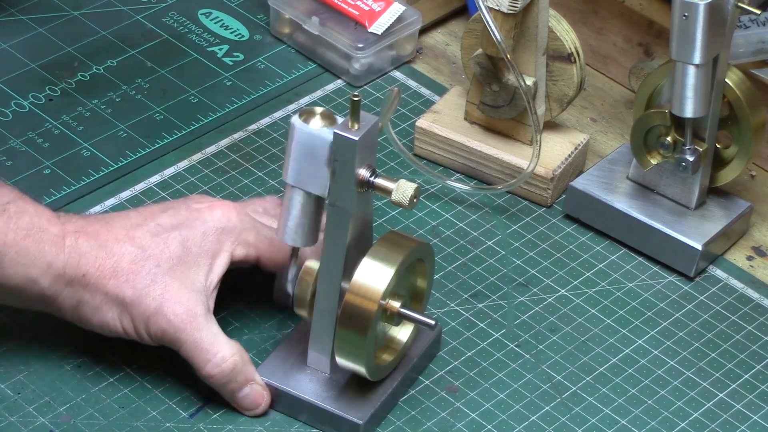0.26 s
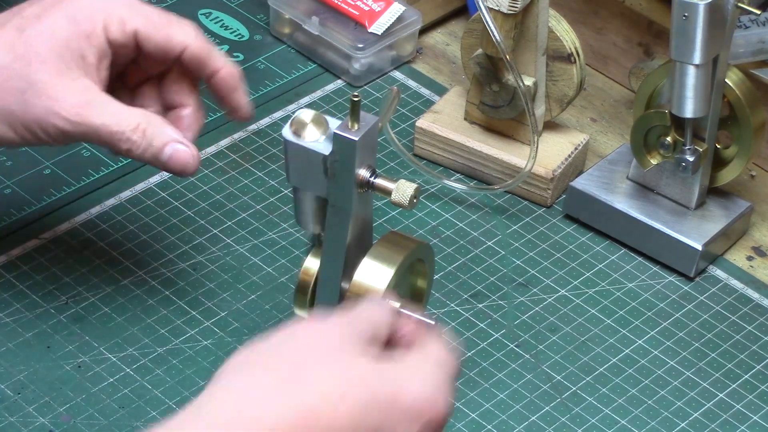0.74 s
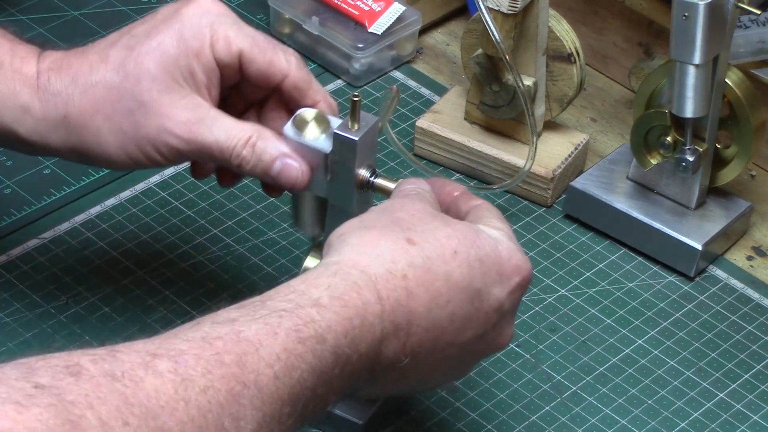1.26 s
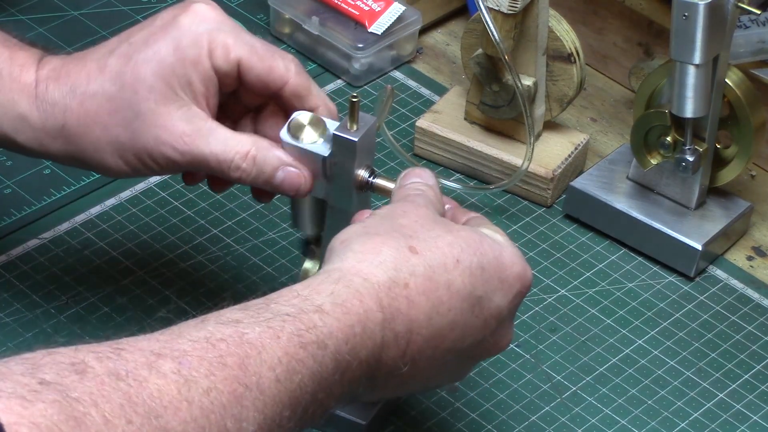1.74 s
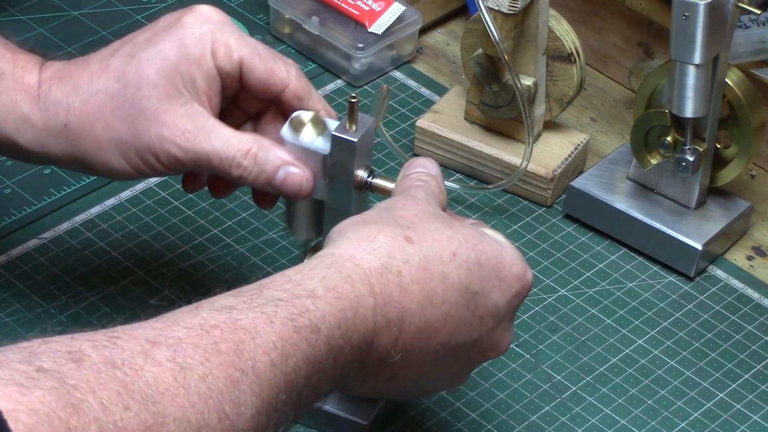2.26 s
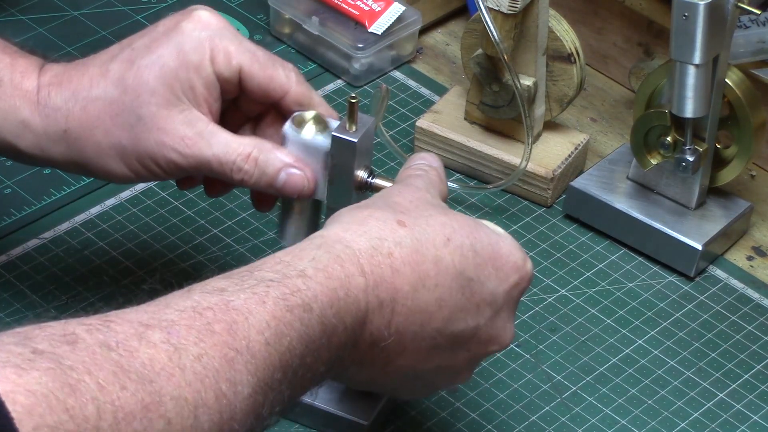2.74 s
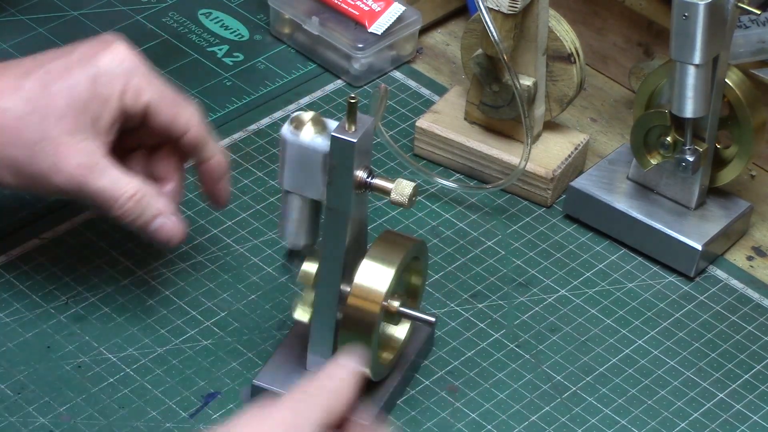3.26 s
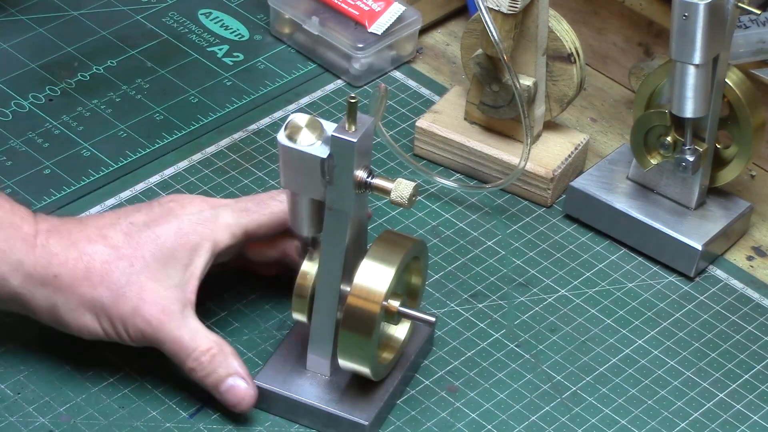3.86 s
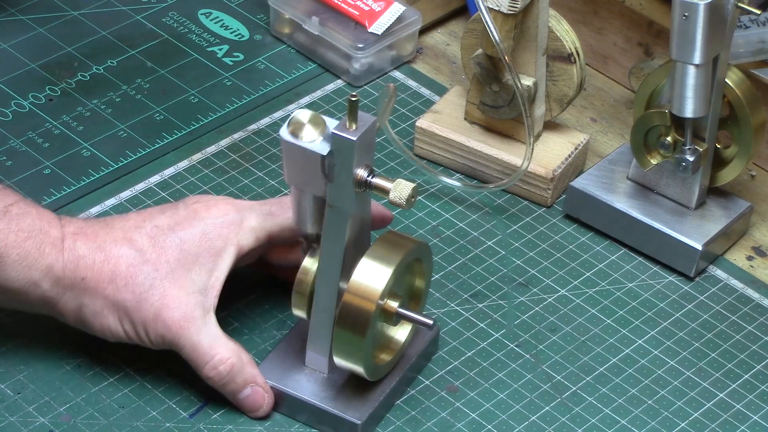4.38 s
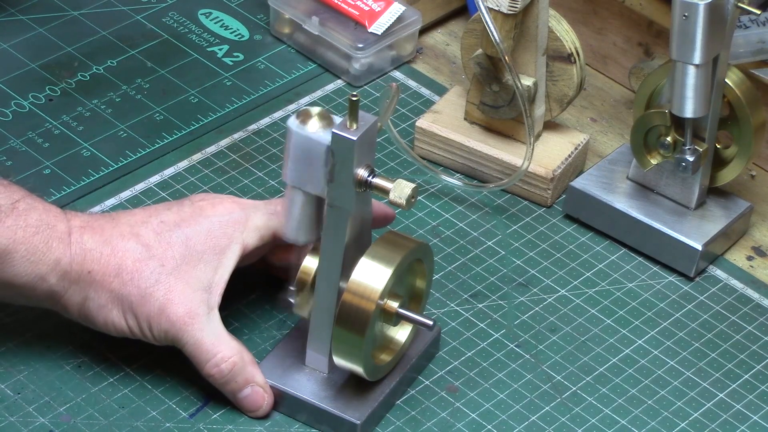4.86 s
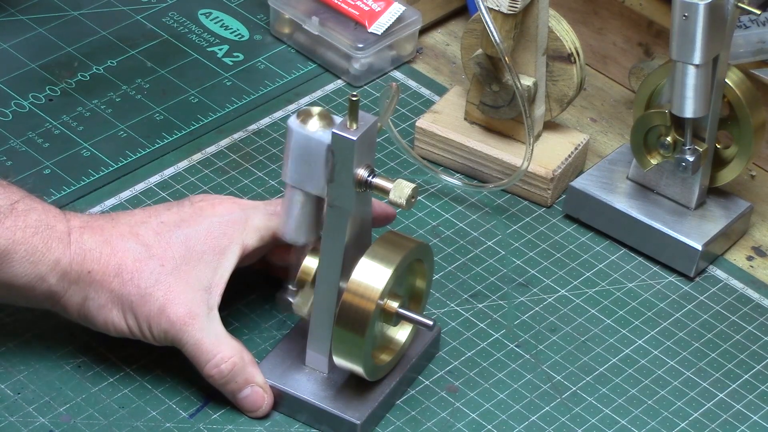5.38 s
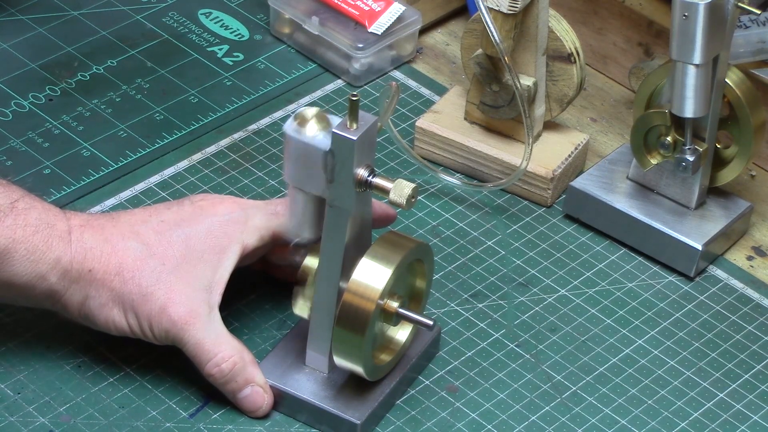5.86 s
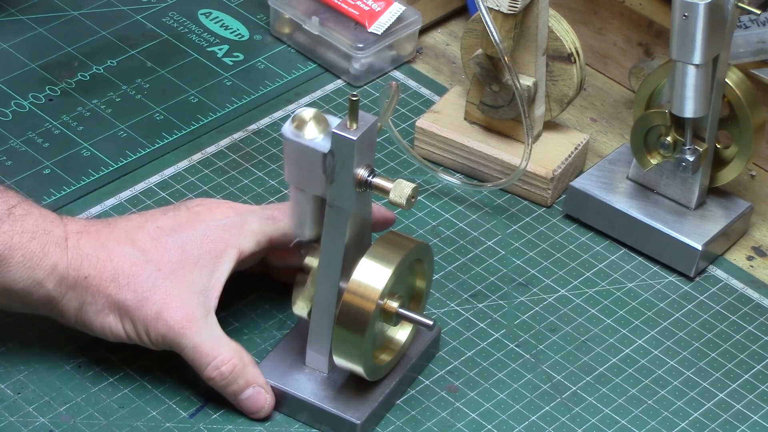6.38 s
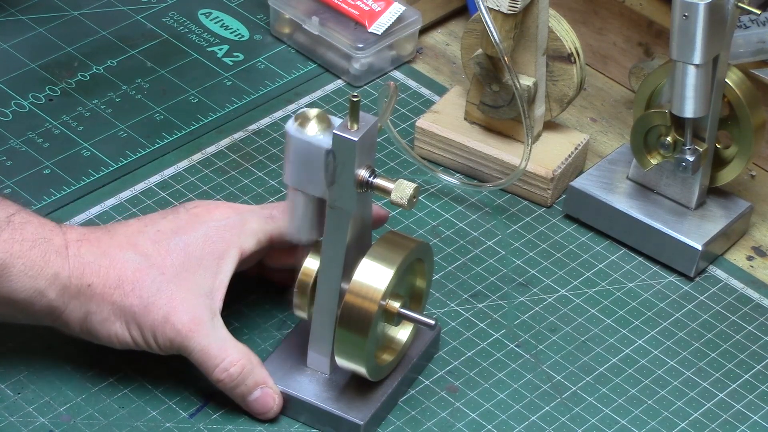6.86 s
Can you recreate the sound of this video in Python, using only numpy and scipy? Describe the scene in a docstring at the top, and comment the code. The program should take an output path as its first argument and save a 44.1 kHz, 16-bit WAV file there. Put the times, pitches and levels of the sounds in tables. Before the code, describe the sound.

A small model steam engine runs on compressed air throughout, close to the microphone on a workshop bench. It beats evenly at about nine and a half strokes a second. Each stroke is a sharp, bright puff with a thin, very high whistle, followed by a duller hiss and a soft crank knock with a faint metallic ring. At about 0.9 seconds a hand brushes briefly against the metal. From around 1.2 seconds the engine slows slightly and the puffs grow a little stronger. It is slowest near 1.7 seconds, and the base gives two quick, muffled bumps on a rubber mat just after. The knocking almost disappears near 2.8 seconds, then returns. By about 3.3 seconds the engine is back at full speed, ticking and puffing steadily until the end at around 7 seconds. Low room noise lies underneath, with very little echo.

```python
"""Workshop bench: a small oscillating-cylinder model steam engine runs on an air line, about 9.5 turns/s.
Once a turn the port opens: a sharp, slightly whistling puff, then the piston's duller push-out.
Half a turn later play in the crank knocks softly, ringing base and frame.
One hand steadies the base, lets go to handle cylinder and pivot nut (the engine slows, the base
bumps twice), then holds it again. Low room noise runs underneath."""
import sys
import numpy as np
from scipy import signal
from scipy.fft import rfft, irfft, next_fast_len
from scipy.io import wavfile
from scipy.ndimage import uniform_filter1d

SR = 44100
rng = np.random.default_rng(int(sys.argv[2]) if len(sys.argv) > 2 else 0)


def to_wav(sig):
    """Store sig (one row per channel, or 1-D mono) as 16-bit WAV at the path in sys.argv[1].

    Samples outside -1..1 are clipped; the rate is SR.
    """
    pcm = np.clip(np.atleast_2d(sig), -1, 1) * 32767
    pcm = np.round(pcm).astype(np.int16)
    wavfile.write(sys.argv[1], SR, pcm.T)  # frames by channels


N = 313987
TIME_S = np.arange(N) / SR
FREQ_HZ = np.maximum(np.fft.rfftfreq(8192, 1 / SR), 1)


def from_db(db):
    """Decibels to gain."""
    return 10 ** (np.asarray(db) / 20)


def unit_rms(x):
    """Scale to rms 1."""
    return x / np.sqrt(np.mean(x ** 2) + 1e-20)


def curve_at(points, at):
    """Linear read of an (x, y) curve."""
    return np.interp(at, *np.transpose(points))


def spectrum_db(points):
    """Join (freq_hz, level_db) points on a log-frequency axis."""
    hz, db = np.transpose(points)
    return np.interp(np.log(FREQ_HZ), np.log(hz), db)


def bell(hz, width_hz):
    """Power response of one resonance."""
    return 1 / (1 + (2 * (FREQ_HZ - hz) / width_hz) ** 2)


def colour(x, response_db):
    """Minimum-phase filter."""
    cepstrum = irfft(np.log(from_db(response_db)))
    half = len(cepstrum) // 2
    folded = np.r_[cepstrum[0], 2 * cepstrum[1:half], np.zeros(half)]
    impulse = irfft(np.exp(rfft(folded)))[:half]
    return signal.fftconvolve(x, impulse)[:N]


def cut(x, hz, kind, order=2):
    """Butterworth low-, high- or band-pass."""
    return signal.sosfilt(signal.butter(order, hz, kind, fs=SR, output="sos"), x)


def noise():
    """White noise, rms 1."""
    return rng.standard_normal(N)


def flutter(rate_hz):
    """Random wavering, rms 1."""
    return unit_rms(cut(noise(), rate_hz, "low"))


def clicks_at(times_s, db):
    """Single-sample impulses."""
    return np.bincount((np.asarray(times_s) * SR).astype(int), from_db(db), minlength=N)[:N]


def ring(clicks, hz, t60_s):
    """A unit click starts a decaying sine of height 1."""
    r, w = from_db(-60 / (t60_s * SR)), 2 * np.pi * hz / SR
    return signal.lfilter([0, np.sin(w)], [1, -2 * r * np.cos(w), r * r], clicks + 1e-18)


def strike(modes, times_s, db, scatter_db, tilt_db_oct=0):
    """Blows ring a set of modes, each at a slightly different level every time."""
    spread_db = rng.normal(0, scatter_db, (len(times_s), len(modes)))
    out = np.zeros(N)
    for k, (hz, mode_db, t60_s) in enumerate(modes):
        blow_db = db + mode_db + spread_db[:, k] + tilt_db_oct * np.log2(hz / 500)
        out += (-1) ** k * ring(clicks_at(times_s, blow_db), hz, t60_s)
    return out


# Room noise spectrum: freq_hz, density_db
ROOM_SPECTRUM = [(25, -26), (45, -14), (80, 0), (130, -1.5), (250, -2), (500, -2.5), (900, -4.5),
                 (1500, -13), (4000, -21), (10000, -12), (16000, -29)]

def room_noise(level_db, side_db):
    """Steady low noise, nearly alike left and right."""
    mid, side = [unit_rms(colour(noise(), spectrum_db(ROOM_SPECTRUM))) for _ in range(2)]
    return from_db(level_db) * (mid + from_db(side_db) * side * np.array([[1], [-1]]))


# Flywheel speed, sagging while the cylinder is handled: time_s, turns_per_s
FLYWHEEL_SPEED = [(0.0, 9.627), (0.79, 9.387), (1.15, 9.509), (1.65, 8.575), (2.11, 9.192), (2.74, 9.395),
                  (3.27, 9.648), (4.06, 9.635), (5.08, 9.598), (5.56, 9.553), (6.54, 9.495), (7.1, 9.497)]

def port_openings(first_s=.0731):
    """The port opens once per flywheel turn; times in s."""
    angle_turns = np.cumsum(curve_at(FLYWHEEL_SPEED, TIME_S)) / SR
    angle_turns -= np.interp(first_s, TIME_S, angle_turns)
    return np.interp(np.arange(int(angle_turns[-1]) + 1), angle_turns, TIME_S)


def each_turn(points):
    """Read a time curve at every port opening."""
    return curve_at(points, port_openings())


def turns():
    """Per sample: turn index, seconds since the port opened."""
    opens_s = port_openings()
    opens_s = np.r_[2 * opens_s[0] - opens_s[1], opens_s]   # already turning at the start
    turn = np.searchsorted(opens_s, TIME_S, side="right") - 1
    return turn, TIME_S - opens_s[turn]


def strokes(shape, level_db, scatter_db):
    """One flow envelope per turn, with random level scatter."""
    turn, age_s = turns()
    stroke_db = level_db + scatter_db * rng.standard_normal(len(level_db))
    return from_db(curve_at(shape, age_s) + np.r_[0, stroke_db][turn])


def air_note(modes, sag_hz, scatter_hz):
    """Complex narrow-band noise; pitch varies per puff and sags as pressure drops."""
    turn, age_s = turns()
    power = sum(from_db(db) ** 2 * bell(hz, width_hz) ** 2 for hz, width_hz, db in modes)
    note = signal.hilbert(colour(noise(), 10 * np.log10(power)), next_fast_len(N))[:N]
    detune_hz = scatter_hz * rng.standard_normal(turn[-1] + 1)
    shift_hz = detune_hz[turn] - sag_hz * np.tanh(age_s / .009 - 1)
    return note * np.exp(2j * np.pi * np.cumsum(shift_hz) / SR)


# Escaping jet spectrum: freq_hz, density_db
JET_SPECTRUM = [(200, -51), (500, -22), (900, -19), (1350, -18.5), (1700, -13.5), (3000, -6), (3950, -12),
                (5600, -13), (6400, 0.5), (8400, -4.5), (9600, 1), (11500, 0.0), (13500, -9), (15600, -9)]
# Resonances and notch of passages, cylinder and frame: centre_hz, width_hz, gain_db
PASSAGE_PEAKS = [(1620, 110, 6), (1810, 150, 6.5), (2300, 170, 7.5), (3650, 140, 4), (4900, 250, 3),
                 (5520, 220, 4), (6140, 70, 4), (6580, 160, 4), (6880, 300, 4), (7750, 390, 5),
                 (8520, 160, -4), (9065, 130, 2), (9650, 250, 3), (10270, 160, 3.5), (12050, 200, 5),
                 (12315, 80, 7), (12900, 200, 8), (13500, 80, 5), (13780, 300, 6), (14490, 190, 9),
                 (15140, 130, 6), (15650, 200, 5)]

def passages(flow):
    """The engine's cavities colour the jet; output rms 1."""
    peaks_db = sum(db * bell(hz, width_hz) for hz, width_hz, db in PASSAGE_PEAKS)
    return unit_rms(colour(flow, spectrum_db(JET_SPECTRUM) + peaks_db))


# Piston-driven flow after the port opens: age_s, level_db
PUSH_FLOW = [(0, -31.5), (.004, -14), (.008, -3), (.018, -1), (.027, -13.5), (.038, -11.5), (.055, -49)]
# Push-out strength: time_s, gain_db
PUSH_GAIN = [(.3, -2.5), (1.3, -2.2), (2.5, -1.75), (3.6, -2.1), (4.9, -1.5), (7.1, -2)]
# Hollow note of the bore: pitch_hz, width_hz, level_db
BORE_MODES = [(2831, 267, 7.5), (3430, 280, -5)]
# Finger grip on the cylinder, loading the engine: time_s, grip_fraction
FINGER_GRIP = [(.8, 0.12), (1.2, 0.57), (2.0, 0.95), (2.75, 0.76), (3.0, 0.23), (5.0, 0.08), (7.1, 0.3)]

def push_out(sputter, split_hz, level_db, bore_db, full_grip_db):
    """The piston expels the remaining air: dull hiss plus a bore note that grip damps."""
    flow = sputter * strokes(PUSH_FLOW, each_turn(PUSH_GAIN), scatter_db=.4)
    hiss = passages(cut(flow * noise(), split_hz, "low", order=4))
    damping = from_db(full_grip_db * curve_at(FINGER_GRIP, TIME_S))
    bore = unit_rms(flow * damping * air_note(BORE_MODES, sag_hz=20, scatter_hz=139.25).real)
    return from_db(level_db) * hiss + from_db(bore_db) * bore


# Hands shifting on metal and mat: peak_s, sigma_s, level_db, centre_hz
HAND_RUBS = [(0.025, 0.014, -50, 483), (0.127, 0.12, -68, 170), (.17, 0.12, -61, 420),
             (0.887, 0.0067, -42.5, 560), (0.878, 0.019, -52, 1450), (1.192, 0.015, -65, 95),
             (2.122, 0.028, -66, 90), (2.984, 0.033, -66, 90)]

def hand_rubs():
    """Sliding skin: Gaussian swells of octave-wide friction noise."""
    out = np.zeros(N)
    for peak_s, sigma_s, db, hz in HAND_RUBS:
        friction = unit_rms(cut(noise(), [hz / np.sqrt(2), hz * np.sqrt(2)], "band"))
        swell = np.exp(-.5 * ((TIME_S - peak_s) / sigma_s) ** 2)
        out += from_db(db) * swell * friction
    return out


# Flow burst after the port opens: age_s, level_db
BLOWDOWN_FLOW = [(0, -78), (.002, -23), (.0045, -10), (.0085, -1), (.013, -2.5), (.018, -11.5), (.024, -18),
                 (.04, -80.5)]
# Hiss treble, lowest with both hands over the engine: time_s, gain_db
HAND_SHADE = [(.2, 3), (.9, 3.5), (1.3, 1), (2.4, -1.5), (3.0, 2.8), (4.3, 2), (4.8, 4), (6.2, 3.5),
              (6.8, 3.2)]

def blowdown(sputter, split_hz, level_db, full_grip_db, shade_hz):
    """Compressed air escapes in a bright puff, stronger under load."""
    flow = sputter * strokes(BLOWDOWN_FLOW, full_grip_db * each_turn(FINGER_GRIP), scatter_db=.4)
    treble = from_db(curve_at(HAND_SHADE, TIME_S)) * cut(noise(), shade_hz, "high", order=8)
    jet = treble + cut(noise(), shade_hz, "low", order=8)
    return from_db(level_db) * passages(cut(flow * jet, split_hz, "high", order=4))


# Port whistle: pitch_hz, width_hz, level_db
WHISTLE_MODES = [(10630, 220, -6), (10995, 44, 1.5), (11270, 150, -11), (11800, 28, -13)]
# Whistle strength: time_s, gain_db
WHISTLE_GAIN = [(.2, 1), (.95, -1), (1.15, 3), (2.7, 2), (3.6, -1), (4.45, -0.5), (4.85, -3.5), (5.6, 0),
                (6.6, .7), (7.1, -.7)]

def port_whistle(level_db, warble_db, build_s):
    """Each blowdown drives a saturated tone that takes a moment to build."""
    note = air_note(WHISTLE_MODES, sag_hz=89.7, scatter_hz=34.29)
    saturated = note.real / np.sqrt(uniform_filter1d(np.abs(note) ** 2, size=200) + 1e-12)
    _, age_s = turns()
    onset = np.clip(age_s / build_s, 0, 1)
    flow = strokes(BLOWDOWN_FLOW, each_turn(WHISTLE_GAIN), scatter_db=1.2)
    warble = from_db(warble_db * flutter(rate_hz=330))
    return from_db(level_db) * unit_rms(saturated * onset * warble * flow)


# Base level of both crank blows, dipping as the pivot nut is turned: time_s, level_db
CRANK_LEVEL = [(0, -50), (.4, -56.5), (1.2, -55.5), (1.6, -52.5), (2.1, -54), (2.78, -69), (3.0, -57),
               (4.3, -57), (5.4, -54), (7.1, -56)]
# Base and bench: pitch_hz, gain_db, t60_s
BASE_MODES = [(78, -20, .16), (97, -16, .17), (130, -14, .1), (183, -12, .11), (260, -8, .025),
              (345, -4, .025), (440, -1, .028), (497, -2, .036), (590, -4, .032), (745, -7, .03)]
# Metal column and flywheel: pitch_hz, gain_db, t60_s
METAL_MODES = [(2290, 0, .07), (2370, -2, .05), (2707, -7, .08), (6440, -5, .09), (6596, -4, .1),
               (6750, -4, .1), (6903, -4, .1), (10640, -2, .08), (10942, -2, .08)]

def crank(slack_gain_db, slack_delay_s, knock_gain_db, knock_delay_s, metal_db):
    """Crank play is taken up lightly during exhaust, harder when pressure returns."""
    slack_s, knock_s = port_openings() + slack_delay_s, port_openings() + knock_delay_s
    level_db = each_turn(CRANK_LEVEL)
    tilt = .5 + 5.5 * each_turn(FINGER_GRIP)   # grip damps the base's low ring
    slack = strike(BASE_MODES, slack_s, level_db + slack_gain_db, scatter_db=2.5, tilt_db_oct=tilt)
    knock = strike(BASE_MODES, knock_s, level_db + knock_gain_db, scatter_db=.8, tilt_db_oct=tilt)
    metal = strike(METAL_MODES, knock_s, metal_db, scatter_db=4.5)
    return slack + knock + metal


# Base contacts, two bumps of three: start_s, level_db
BASE_CONTACTS = [(1.741, -28), (1.75, -30), (1.774, -31), (1.855, -28), (1.868, -34), (1.891, -37)]

def base_bumps(mat_cutoff_hz):
    """The base rocks; the rubber mat softens each contact."""
    start_s, level_db = np.transpose(BASE_CONTACTS)
    blows = strike(BASE_MODES, start_s, level_db, scatter_db=3.5, tilt_db_oct=2.5)
    return cut(blows, mat_cutoff_hz, "low", order=3)


# Reflections off bench and nearby objects: delay_s, gain_db
BENCH_ECHOES = [(.000635, -14), (.00102, -20), (.002177, -22), (.0058, -22), (.018, -18), (.0205, -19)]

def workshop(x, wet_db, low_t60_s, high_t60_s, build_s):
    """Close reflections, then a short bass-light tail whose treble dies first."""
    age_s = TIME_S[:SR // 3]
    diffuse = cut(rng.standard_normal(len(age_s)), 300, "high")
    low = cut(diffuse, 7500, "low") * from_db(-60 * age_s / low_t60_s)
    high = cut(diffuse, 7500, "high") * from_db(-60 * age_s / high_t60_s)
    tail = (low - high) * (1 - np.exp(-age_s / build_s))
    echoes = clicks_at(*np.transpose(BENCH_ECHOES))[:len(age_s)]
    response = echoes + from_db(wet_db) * tail / np.sqrt(np.sum(tail ** 2))
    return x + signal.fftconvolve(x, response)[:N]


def stereo_pair(x, treble_side_db, balance_db, low_side_db):
    """Two close capsules differ slightly in treble and in low bench reflections."""
    delayed = np.r_[np.zeros(SR // 200), x][:N]
    low = from_db(low_side_db) * cut(delayed, 460, "low", order=4)
    treble = from_db(treble_side_db) * cut(x, 10000, "high")
    side = treble + from_db(balance_db) * x + low
    return np.array([x + side, x - side])


def scene():
    """Engine and hands in the workshop."""
    ambience = room_noise(level_db=-59, side_db=-13)
    sputter = from_db(2 * flutter(rate_hz=1170))   # oil in the port
    split_hz = 5210   # push-out hiss below, blowdown above
    near = push_out(sputter, split_hz, level_db=-42.5, bore_db=-48, full_grip_db=-6)
    near += hand_rubs()
    near += blowdown(sputter, split_hz, level_db=-31, full_grip_db=2, shade_hz=11570)
    near += port_whistle(level_db=-33.5, warble_db=1.3, build_s=.0051)
    near += crank(slack_gain_db=6, slack_delay_s=.023,
                  knock_gain_db=13, knock_delay_s=.0485, metal_db=-55.5)
    near += base_bumps(mat_cutoff_hz=230)
    room = workshop(near, wet_db=-9, low_t60_s=.145, high_t60_s=.112, build_s=.0046)
    return ambience + stereo_pair(room, treble_side_db=-19, balance_db=-46, low_side_db=-20)


def record(dry):
    """48 Hz high-pass, steep 15.78 kHz low-pass."""
    lowpass = signal.ellip(12, .1, 80, 15780, fs=SR, output="sos")
    return signal.sosfilt(lowpass, cut(dry, 48, "high"))


dry = scene()
out = record(dry)
to_wav(out)
```